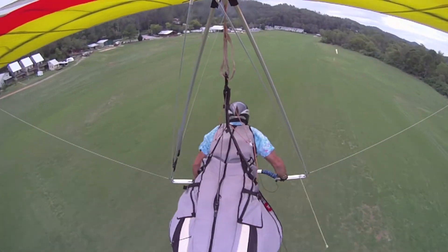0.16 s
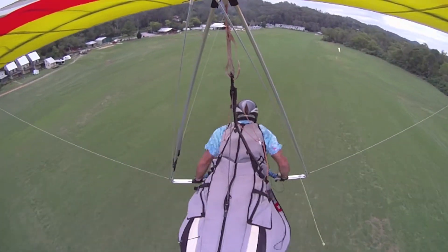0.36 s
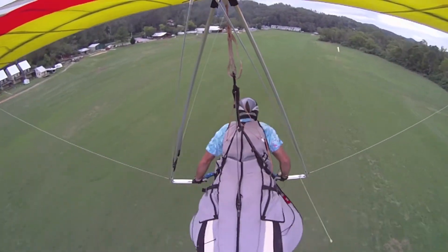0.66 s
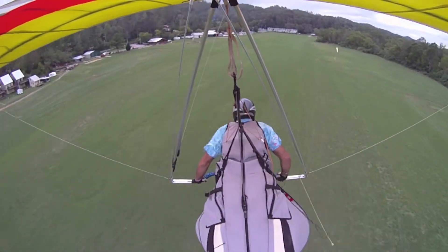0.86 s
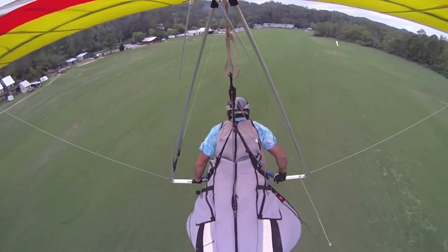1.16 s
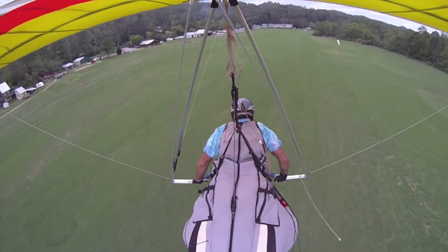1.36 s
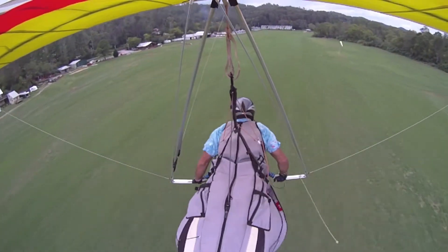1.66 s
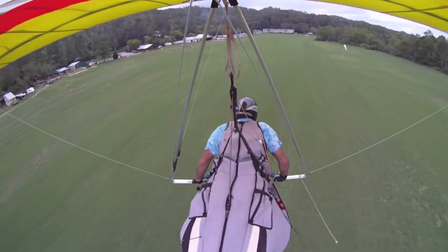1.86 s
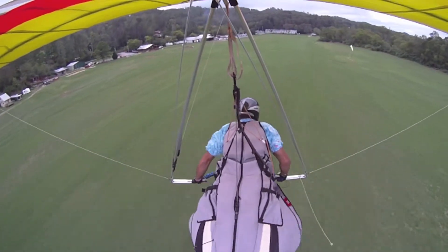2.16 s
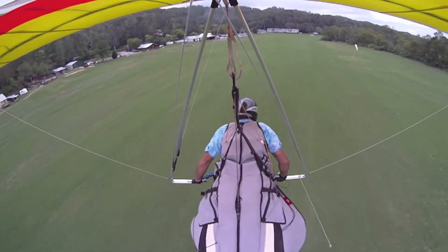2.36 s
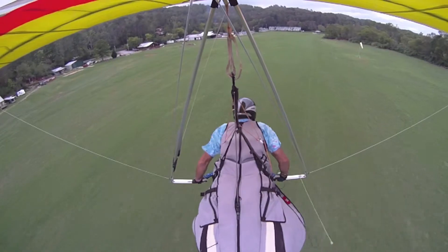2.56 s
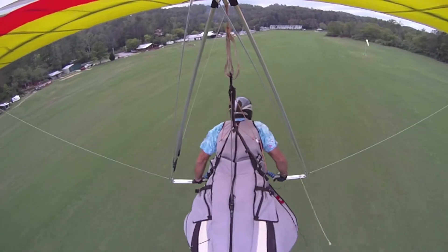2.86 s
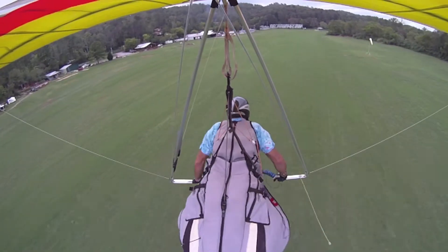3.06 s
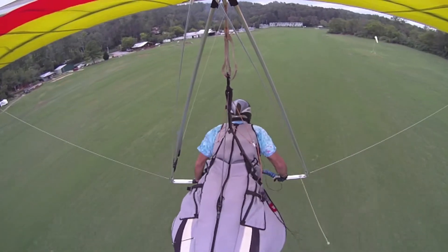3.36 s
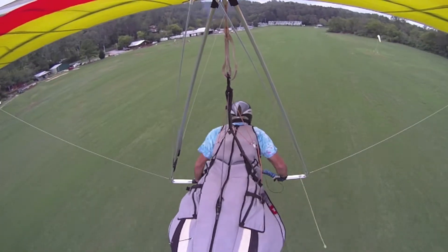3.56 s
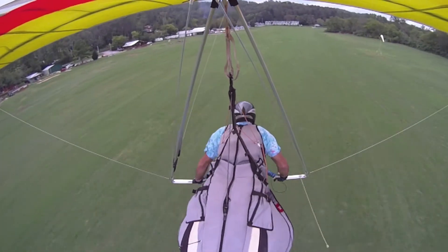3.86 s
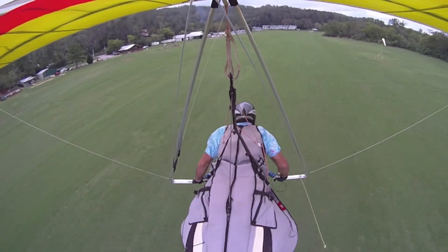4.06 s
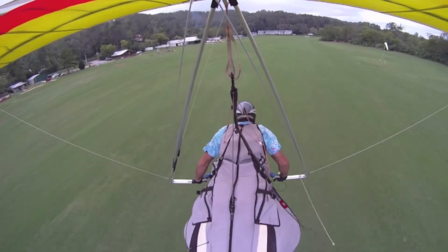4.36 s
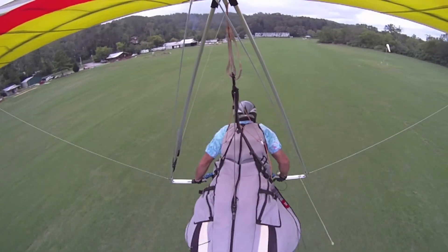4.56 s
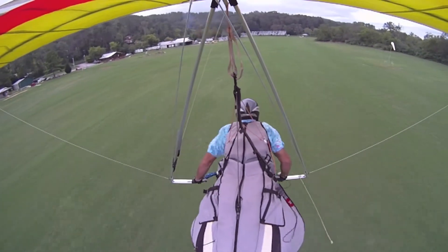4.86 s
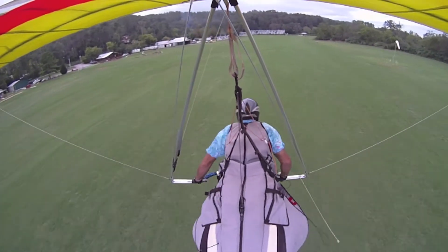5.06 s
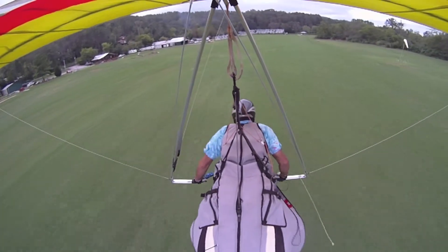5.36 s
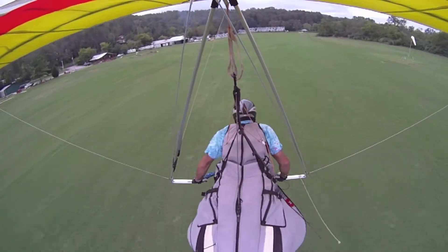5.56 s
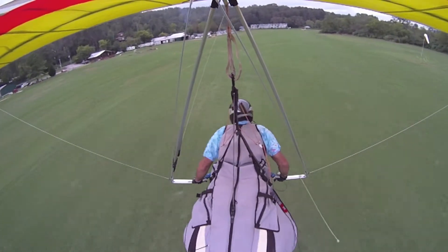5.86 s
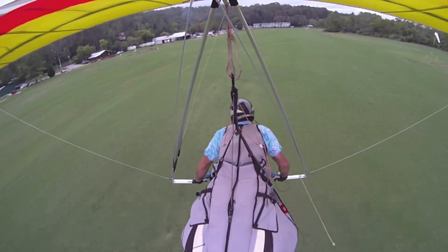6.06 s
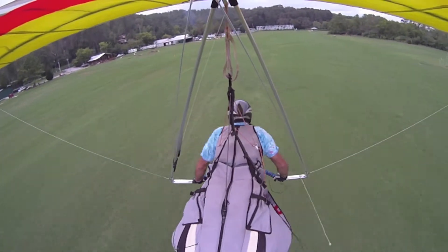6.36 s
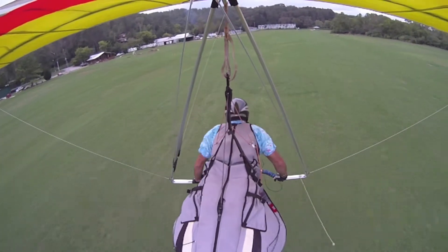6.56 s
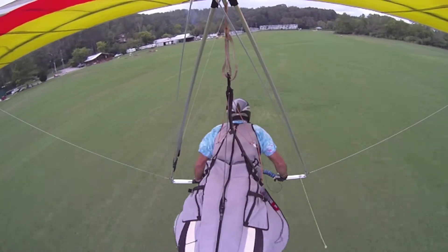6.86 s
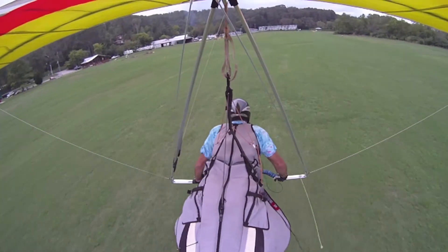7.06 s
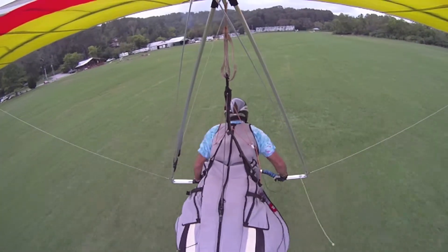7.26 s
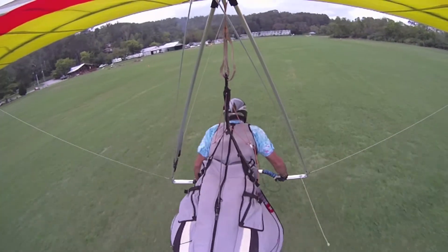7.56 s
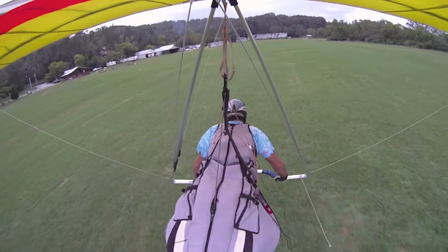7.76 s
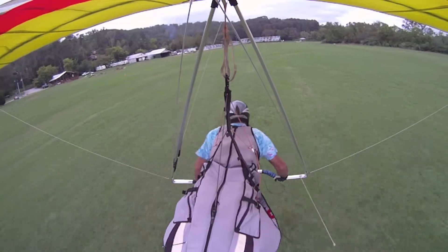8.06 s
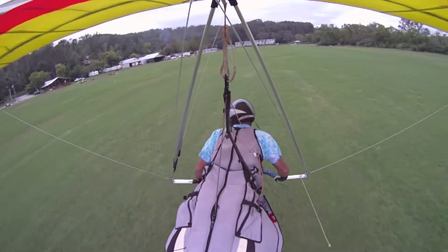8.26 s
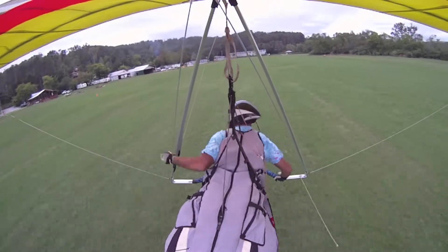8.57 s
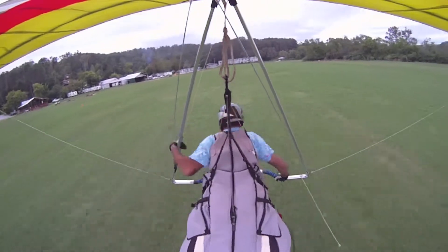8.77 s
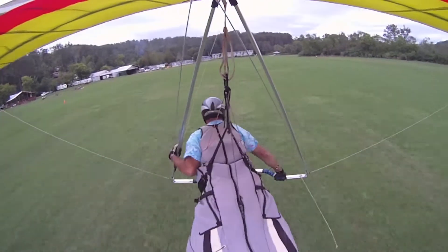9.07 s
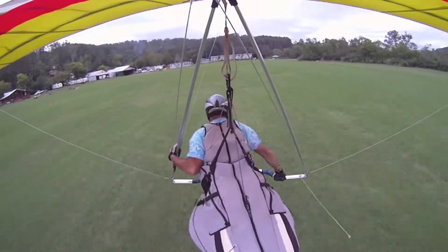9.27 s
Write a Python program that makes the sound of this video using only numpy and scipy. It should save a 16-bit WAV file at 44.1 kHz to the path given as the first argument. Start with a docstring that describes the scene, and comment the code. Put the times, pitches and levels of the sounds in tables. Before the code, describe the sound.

Wind rushes over a microphone sealed in a housing on a hang glider coming in low over a field. A strong, muffled, mid-heavy roar with hiss opens the scene, crackling with overload ticks, then drops into choppy gusts. Full gusts return around three to four seconds and again near seven. The later lulls flutter with short puffs, and a cluster of light frame knocks comes just before nine seconds.

```python
"""Gusty wind is heard first: a close, uneven buffeting with a hissing top, sharp slaps and ticks.
The microphone sits behind the port of a closed camera housing, fixed to the keel of a hang glider coming in to land.
Noise and sparse spikes, shaped by the gusts, make the airflow; its deepest pressure troughs overload into ticks.
Short pulses make the slaps, decaying sines and noise the knocks of the frame at the mount.
Behind them lie the wing's drone as low noise, and a faint whine and hiss from the electronics."""
import sys
import numpy as np
from scipy import signal
from scipy.fft import rfft, irfft, next_fast_len
from scipy.io import wavfile
from scipy.ndimage import uniform_filter1d, map_coordinates

SR = 44100
rng = np.random.default_rng(int(sys.argv[2]) if len(sys.argv) > 2 else 0)


def pcm_store(signal):
    """Save signal as 16-bit PCM."""
    levels = np.round(np.clip(np.atleast_2d(signal), -1, 1) * 32767)
    wavfile.write(sys.argv[1], SR, levels.astype(np.int16).T)


N = 414979

# Airflow at the port: [t/s, buffeting level/dB, port hiss relative to buffeting/dB]
GUST_COURSE = [(0.0, -15.5, -11), (0.05, -14.5, -15), (0.08, -13.5, -15), (0.42, -14, -15), (0.6, -18, -12),
               (0.84, -18, -14.5), (0.91, -21.5, -10.5), (1.15, -16, -13.5), (1.57, -28, -12),
               (1.65, -24.5, -9.5), (1.67, -28, -11.5), (1.83, -22.5, -11), (1.96, -27, -12),
               (1.99, -27, -7), (2.1, -22, -11), (2.12, -25.5, -11), (2.17, -31.5, -10),
               (2.41, -27.5, -11.5), (2.44, -24, -12), (2.49, -19, -13), (2.98, -19, -12.5),
               (3.01, -18, -14), (3.3, -20.5, -12.5), (3.33, -17.5, -15), (3.38, -17, -14),
               (4.22, -22.5, -11.5), (4.27, -24.5, -10.5), (4.3, -22.5, -11), (4.37, -17, -16),
               (4.43, -23, -11), (4.72, -30.5, -12), (4.74, -25.5, -15.5), (4.93, -31, -10),
               (5.06, -26, -11.5), (5.08, -30.5, -12.5), (5.24, -30.5, -10.5), (5.29, -22.5, -11),
               (5.37, -27, -10.5), (5.58, -30.5, -12), (6.05, -29.5, -11), (6.16, -34.5, -11.5),
               (6.26, -26.5, -12), (6.42, -27.5, -10), (6.63, -25.5, -12), (6.68, -30.5, -10),
               (6.73, -20.5, -14), (7.26, -18.5, -13), (7.7, -28.5, -12), (7.78, -28, -10.5),
               (7.81, -32, -10.5), (7.92, -27, -12), (8.02, -30.5, -11.5), (8.25, -26.5, -9.5),
               (8.36, -30.5, -11.5), (8.49, -32, -11.5), (8.6, -27.5, -11), (8.88, -26.5, -7),
               (9.07, -22.5, -9.5), (9.3, -28, -7), (9.41, -25.5, -7.5)]
# Sudden puffs and slight dips inside the flow: [t/s, level change/dB, length/ms]
PUFF_EVENTS = [(1.067, 3, 11), (1.424, 6, 8.9), (1.601, 6, 7.4), (1.628, 3.5, 23), (1.678, 6, 25),
               (1.785, 2.5, 12), (1.838, 4.5, 13), (1.906, 8, 6), (1.93, 6, 9.3), (1.982, 9, 6.5),
               (2.012, 8, 10), (2.043, 3.5, 15), (2.085, 2, 17), (2.25, 3, 10), (2.35, 2, 10),
               (2.445, 3, 12), (3.262, -1, 9.4), (3.364, 1, 11), (3.675, -1, 8), (3.711, 0, 10),
               (3.803, 4, 5.9), (3.897, 0, 13), (3.964, 2, 13.5), (4.05, 8.5, 10), (4.175, 5, 8),
               (4.6, 6, 12), (4.73, 4.5, 8.3), (4.8, 6, 8.9), (5.045, 9, 15), (5.277, 6, 8),
               (5.321, 5, 6.9), (5.349, 6, 5), (5.466, 7, 8.1), (5.754, 6, 14), (5.8, 1.5, 35),
               (5.898, 2, 10), (5.955, 4.5, 25), (6.085, 6, 9.8), (6.115, 5.5, 9), (6.15, 1, 18),
               (6.197, 5, 11), (6.308, 4.5, 9.3), (6.718, 1, 9.2), (7.636, 6, 9.1), (7.783, 6.5, 7.9),
               (7.905, 7, 11), (8.095, 5.5, 12), (8.139, 3, 6), (8.184, 4, 10), (8.227, 3.5, 39),
               (8.29, 2, 37), (8.525, 3.5, 22), (8.606, 3, 25), (8.791, 3, 12), (8.83, 2, 28),
               (8.885, 2, 11), (8.912, 0.5, 21), (8.97, 1.5, 27), (9.048, 5.5, 10), (9.074, 5, 16)]
# Colour of the low buffeting: [f/Hz, gain/dB]
BUFFET_COLOUR = [(20, -77.5), (76, -39.5), (180, -15), (270, -8), (364, -3), (440, -2.5), (535, -2.5),
                 (650, -3.5), (800, -5), (1200, -11.5), (1700, -28), (3000, -56), (8000, -110)]
# Colour of the mid-range roar: [f/Hz, gain/dB]
ROAR_COLOUR = [(300, -60.5), (600, -33), (1000, -3.5), (1300, -2), (1520, -2), (1700, -11.5), (2200, -30.5),
               (3000, -54), (8000, -110)]
# Colour of the hiss at the port: [f/Hz, gain/dB]
HISS_COLOUR = [(500, -60), (1200, -31), (1800, 1.5), (2500, 1.5), (2900, -2), (3500, -1), (4230, 1.5),
               (5000, -12), (5680, -19), (6500, -24), (9000, -35.5), (15500, -89)]
# Colour of the airflow's topmost fizz: [f/Hz, gain/dB]
FIZZ_COLOUR = [(1500, -69.5), (3000, -34), (5000, 6.5), (6500, -5), (8500, -12), (10500, -19.5),
               (13000, -24), (15000, -26.5), (15600, -36)]
# Single hard eddies that slap the port: [t/s, peak level ahead of the port/dB, width/ms]
SLAP_EVENTS = [(0.22, 0, 0.44), (1.604, -7, 0.5), (1.64, -8, 0.37), (1.787, -7, 0.34), (1.982, -8, 0.088),
               (2.4469, -2.5, 0.48), (3.366, -3, 0.44), (4.178, -4, 0.52), (4.9945, -7, 0.31),
               (5.2562, -9, 0.29), (5.2816, -0.5, 0.14), (5.3227, -4.5, 0.15), (6.7209, -6.5, 0.63),
               (7.786, -4, 0.29), (8.242, -9, 0.3), (8.9715, -11, 0.33), (9.05, -9, 0.28),
               (9.0665, -3, 0.36)]
# Overload ticks at set times, some on a slap: [t/s, relative level/dB]
TICK_EVENTS = [(0.0265, -34), (0.046, -35), (0.079, -31), (0.131, -38), (0.2015, -32), (0.2135, -30.5),
               (0.235, -35), (0.264, -33), (0.2843, -37), (0.3095, -38), (0.333, -37), (0.358, -32),
               (0.4003, -35), (0.4475, -38), (0.4746, -37), (0.6465, -35), (0.7824, -42), (1.1222, -42),
               (3.183, -38), (3.365, -37), (3.437, -37), (3.481, -38), (3.5632, -38), (3.6816, -41),
               (3.7133, -39), (3.7776, -40), (3.807, -38), (4.0564, -37), (4.363, -34), (5.2825, -28.5),
               (6.751, -37), (6.8879, -40), (9.061, -40)]
# Knocks through the frame, relative levels: [t/s, low mode/dB, middle mode/dB, upper mode/dB, sway/dB]
KNOCK_EVENTS = [(5.144, -16.5, -40, -48, -59), (5.6428, -12.5, -26, -29, -55), (8.8338, -9, -18, -28, -33),
                (8.889, -18, -30, -15, -55), (8.915, -13.5, -32, -32, -49), (8.935, -17, -32, -31, -55),
                (8.9948, -22, -26, -19, -55), (9.024, -16, -30, -18, -48), (9.076, -21, -19, -15, -54)]
# Modes of the frame (low, middle, upper, sway): [f/Hz, time to fall 60 dB/s]
FRAME_MODES = [(1410, 0.021), (2370, 0.015), (3920, 0.012), (60.4, 0.25)]
# Colour of a knock's dry body: [f/Hz, gain/dB]
RAP_COLOUR = [(300, -31), (1000, 2), (1500, 9.5), (2400, -13.5), (4000, -8), (8000, -50), (15000, -80)]
# Colour of the wing's steady drone: [f/Hz, gain/dB]
WING_COLOUR = [(15, -27.5), (30, -10.5), (60, -3), (150, 7.5), (250, 12), (500, -2), (1000, -38),
               (4000, -100)]
# Colour of the input's own hiss: [f/Hz, gain/dB]
INPUT_HISS_COLOUR = [(3000, -8.5), (6000, 0), (10000, -2), (13000, 0), (15000, -9), (15600, -16)]

CRUISE_DB = -21  # buffeting of a middling gust
ROAR_DB, ROAR_GROWS = -30, 0.68  # at a middling gust; dB per dB of gust
FIZZ_DB, FIZZ_GROWS, FIZZ_FOLLOWS = -44, 1.62, 0.67  # same, then dB per dB of relative port hiss
BASS_HZ, BASS_LAGS = 436, 0.13  # below it the buffeting grows this many dB per dB less than the gust
# shared flutter, and the own flutter of buffet, roar and hiss, dB rms before choppiness; knots per second
FLUTTER_DB, OWN_FLUTTER_DB, FLUTTER_RATE = 0.12, .5, 36
PUFF_ONSET_S = .0009
PORT_HZ, PORT_WIDTH_HZ = 4200, 4700  # the port resonates broadly here and muffles what lies above
OVERLOAD = .52  # trough depth that overloads
TICK_DB, TICK_GROWS = -42.5, 1.4  # relative level there, dB per dB deeper
MODE_ATTACKS_S = (.0012, 0.0012, 0.0011, 0.0027)  # one per frame mode
WHINE_HZ, BEAT_HZ = 7867.2, 29.97
WHINE_DB, FLIP_SHARPNESS = -65, 5
CEILING, TOP_HZ = .93, 15600  # rounding level and band limit of the input


def airflow():
    """Turbulence at the port drives four layers; common lumps of air modulate all, common spikes excite all."""
    s, *levels = np.transpose(GUST_COURSE)
    buffet_db, hiss_over_db = (np.interp(np.arange(N) / SR, s, level) for level in levels)
    gust_db = buffet_db - CRUISE_DB
    choppy = np.clip(1 - 0.073 * gust_db, .3, 2)  # slack air flutters, a full gust streams evenly
    flutter_db = choppy * FLUTTER_DB * wobble(FLUTTER_RATE)
    lumps_db = choppy * (0.099 * wobble(30) + 0.59 * wobble(70) + 1.66 * wobble(240))
    spikes = choppy * eddies(rate=300, spread_db=6.5)

    def layer(lump_share, patchy_db, spike_share, colour):
        """Patchy noise and the common spikes, swelled by the lumps and then coloured."""
        turbulence = patchy(patchy_db) + spike_share * spikes
        return coloured(amp(lump_share * lumps_db) * turbulence, colour)

    def own_flutter_db():
        """Level flutter drawn anew for one layer."""
        return choppy * OWN_FLUTTER_DB * wobble(FLUTTER_RATE)

    buffet = layer(0.6, 1.27, .45, BUFFET_COLOUR)
    roar = layer(0.2, 1.0, .45, ROAR_COLOUR)
    hiss = layer(0.74, 1.1, .4, HISS_COLOUR)
    fizz = layer(1.5, 0.5, .3, FIZZ_COLOUR)
    bass = signal.sosfiltfilt(signal.butter(2, BASS_HZ, fs=SR, output="sos"), buffet)
    buffet = buffet + (amp(-BASS_LAGS * gust_db) - 1) * bass
    small_slaps = signal.fftconvolve(-eddies(rate=45, spread_db=1.0), suction(width_ms=0.37), "same")
    chop_db = puffs() + flutter_db

    body = amp(buffet_db + own_flutter_db()) * (unit(buffet) + 0.31 * unit(small_slaps))
    body += amp(ROAR_DB + ROAR_GROWS * gust_db + own_flutter_db()) * unit(roar)
    top = amp(buffet_db + hiss_over_db + own_flutter_db()) * unit(hiss)
    top += amp(FIZZ_DB + FIZZ_GROWS * gust_db + FIZZ_FOLLOWS * hiss_over_db) * unit(fizz)
    return amp(0.85 * chop_db) * body + amp(chop_db) * top


def eddies(rate, spread_db):
    """Sparse suction spikes, on average rate per second, of unequal but bounded size."""
    chance, size = rng.random(N), rng.exponential(size=N)
    return -unit((chance < rate / SR) * amp(spread_db * np.minimum(size, 2)))


def puffs():
    """A gain in dB that shifts suddenly at each puff or slight dip, holds and lets go."""
    gain_db, t = np.zeros(N), np.arange(SR // 5) / SR
    for s, change_db, lasts_ms in PUFF_EVENTS:
        onset = 1 - np.exp(-t / PUFF_ONSET_S)
        release = np.exp(-(t / lasts_ms * 1000) ** 3)
        gain_db[round(s * SR):][:len(t)] += change_db * onset * release
    return gain_db


def suction(width_ms):
    """A short drop of pressure inside a broader, weaker swell."""
    u = np.arange(-SR // 200, SR // 200) / SR / (width_ms / 1000 * .42)
    return np.exp(-u * u / 2 / 5 ** 2) / 5 - np.exp(-u * u / 2)


def slaps():
    """The hardest eddies stand out one by one, heard through the damped resonance of the port."""
    pulses = np.zeros(N)
    for s, db, width_ms in SLAP_EVENTS:
        pulse = suction(width_ms)
        pulses[round(s * SR) - len(pulse) // 2:][:len(pulse)] += amp(db) * pulse
    hz = np.fft.rfftfreq(N, 1 / SR)
    port = PORT_HZ ** 2 / (PORT_HZ ** 2 - hz ** 2 + 1j * hz * PORT_WIDTH_HZ)
    return irfft(rfft(pulses) * port, N)


def ticks(pressure):
    """An overload cuts the cap off a deep trough: a sharp corner, then a softer one a fraction of a ms later."""
    out, t, chance = np.zeros(N + SR), np.arange(SR // 100) / SR, rng.random(N)
    troughs = signal.find_peaks(-pressure, height=OVERLOAD, distance=SR // 500)[0]
    deeper_db = 20 * np.log10(-pressure[troughs] / OVERLOAD)
    overloads = list(zip(troughs, TICK_DB + TICK_GROWS * deeper_db))
    overloads += [(round(s * SR), db) for s, db in TICK_EVENTS]
    for at, db in overloads:
        width = 0.0002 + 0.00019 * chance[at]  # seconds
        # unit slope per sample at the first corner
        cap = SR * np.maximum(t * (width - t), 0) / width * np.exp(-1.2 * t / width)
        out[at:][:len(t)] += amp(db + 18.5) * cap
    return signal.sosfilt(signal.butter(2, [2500, 13000], "band", fs=SR, output="sos"), out[:N])


def frame():
    """Each knock is a dry noise rap that rings the modes of the frame at its own strengths."""
    ringing, raps, t = np.zeros(N + SR), np.zeros(N + SR), np.arange(SR // 2) / SR
    for s, *levels in KNOCK_EVENTS:
        at = round(s * SR)
        raps[at:][:len(t)] += amp(max(levels) + 1.5 - 60 * t / 0.055) * (1 - np.exp(-t / 0.0023))
        for (hz, t60), db, attack in zip(FRAME_MODES, levels, MODE_ATTACKS_S):
            envelope = amp(db + 4.5 - 60 * t / t60) * (1 - np.exp(-t / attack))
            ringing[at:][:len(t)] += envelope * np.sin(2 * np.pi * hz * t)
    return ringing[:N] + coloured(raps[:N] * rng.standard_normal(N), RAP_COLOUR)


def wing():
    """The wing drones through the mount as low noise, its level wavering slightly."""
    return amp(-39.0 + 0.54 * wobble(3.3)) * unit(coloured(rng.standard_normal(N), WING_COLOUR))


def electronics():
    """A thin whine whose sign flips at a steady beat, over the input's own hiss."""
    t = np.arange(N) / SR
    flips = np.tanh(FLIP_SHARPNESS * np.sin(2 * np.pi * BEAT_HZ * t))
    whine = amp(WHINE_DB) * flips * np.cos(2 * np.pi * WHINE_HZ * t)
    input_hiss = unit(coloured(patchy(patchy_db=5.0), INPUT_HISS_COLOUR))
    return whine + amp(-77.5) * input_hiss


def patchy(patchy_db):
    """White noise at rms 1 whose gain varies in patches of time and frequency."""
    z = signal.stft(rng.standard_normal(N + 512), nperseg=256)[2]
    field = uniform_filter1d(rng.standard_normal(z.shape), size=2, axis=0)  # over frequency
    field = uniform_filter1d(field, size=10, axis=1)  # over time
    return unit(signal.istft(z * amp(patchy_db * unit(field)), nperseg=256)[1][:N])


def coloured(x, spectrum):
    """x through the causal minimum-phase filter with the given (f/Hz, gain/dB)."""
    size = next_fast_len(N + 8192)
    hz, db = np.transpose(spectrum)
    grid = np.fft.rfftfreq(size, 1 / SR)
    gain = amp(np.interp(np.log(grid + 1), np.log(hz), db))
    cepstrum = irfft(np.log(gain), size)
    cepstrum[1:size // 2] *= 2  # folding the cepstrum makes the filter causal
    cepstrum[size // 2 + 1:] = 0
    return irfft(rfft(x, size) * np.exp(rfft(cepstrum)), size)[:N]


def wobble(rate):
    """A smooth random curve of rms 1, rate knots a second."""
    knots = rng.standard_normal(int(N * rate / SR) + 4)
    return unit(map_coordinates(knots, [np.arange(N) * rate / SR]))


def unit(x):
    """x at rms 1."""
    return x / np.sqrt(np.mean(x ** 2) + 1e-20)


def amp(db):
    """Gain of a level in dB."""
    return 10 ** (np.asarray(db) / 20)


def scene():
    """Everything that reaches the single microphone channel, with the electronics added."""
    air = airflow()
    return (air + wing() + slaps() + ticks(air) + frame() + electronics())[None]


def record(dry):
    """The input rounds off the highest peaks and keeps nothing above its band limit."""
    size = next_fast_len(N + 8192)
    rounded = dry / (1 + np.abs(dry / CEILING) ** 8) ** (1 / 8)
    passed = np.fft.rfftfreq(size, 1 / SR) < TOP_HZ
    return irfft(rfft(rounded, size) * passed, size)[:, :N]


dry = scene()
out = record(dry)
pcm_store(out)
```